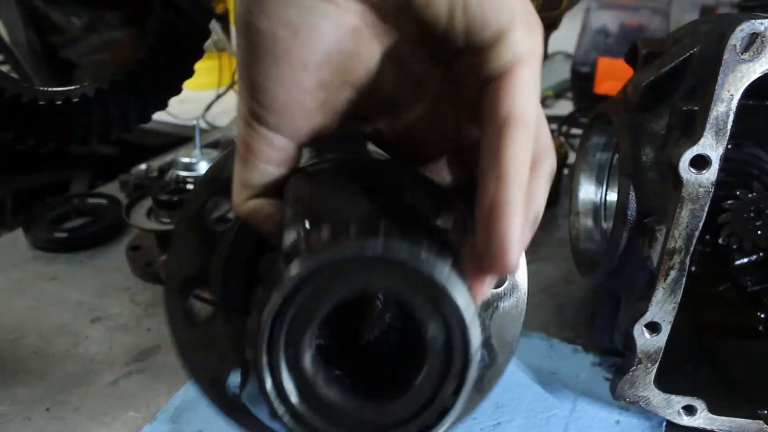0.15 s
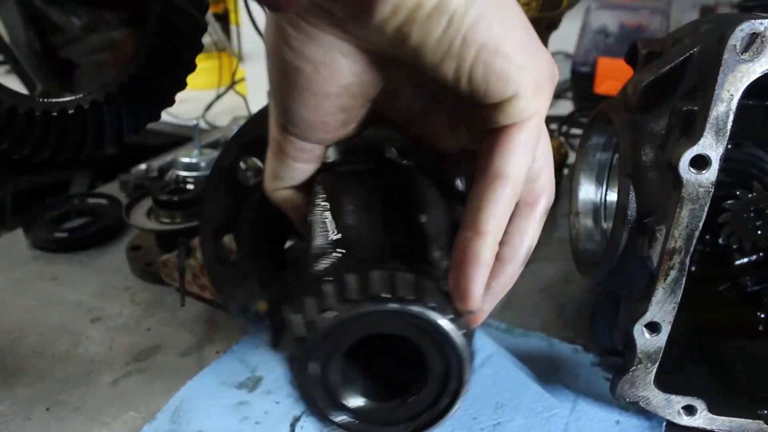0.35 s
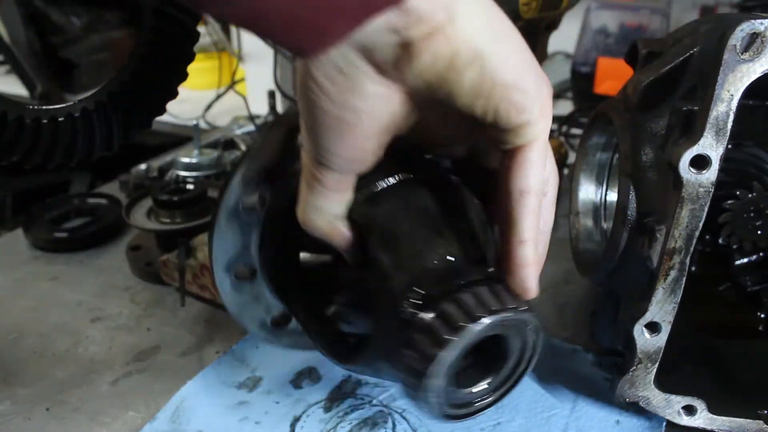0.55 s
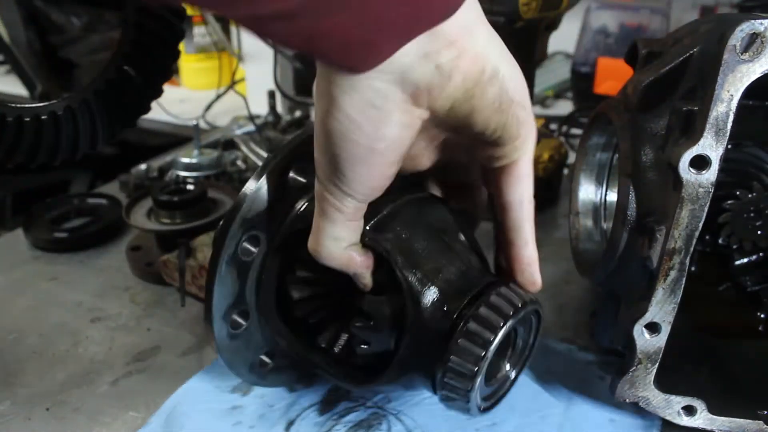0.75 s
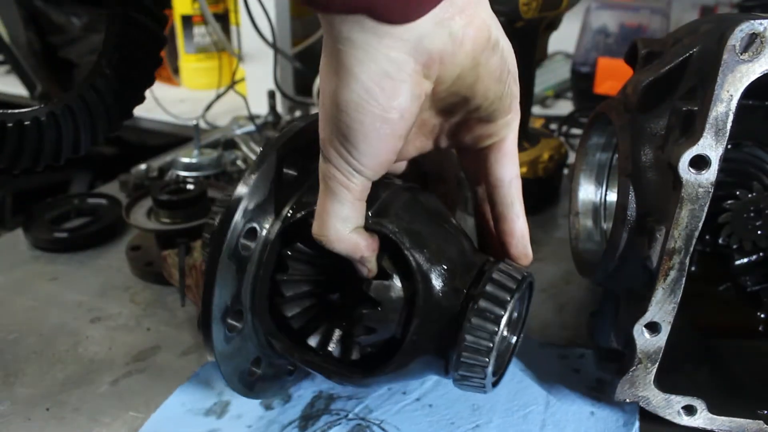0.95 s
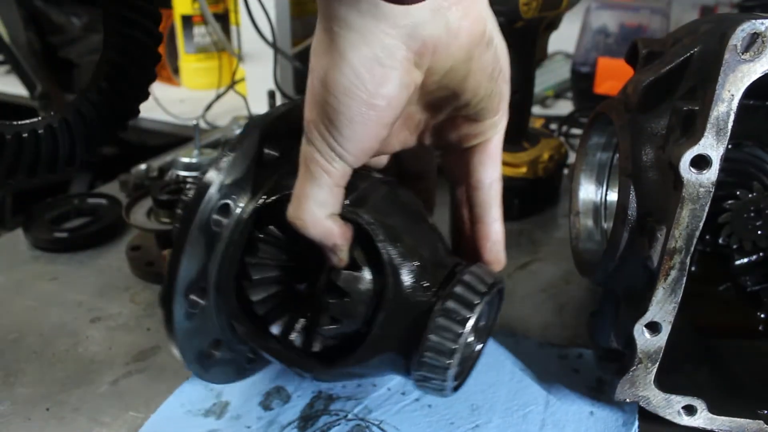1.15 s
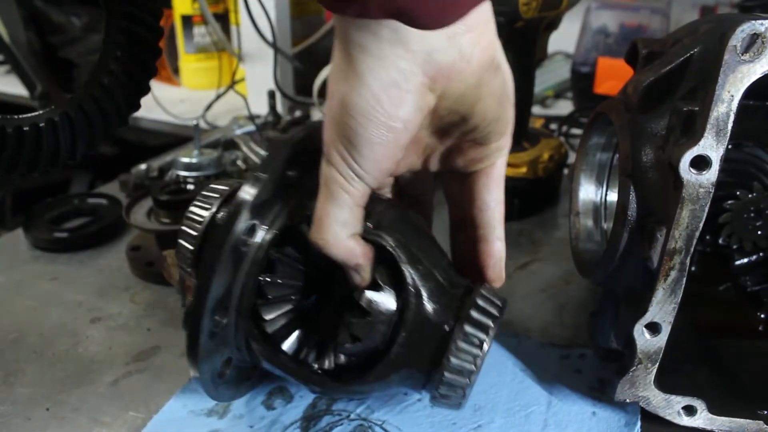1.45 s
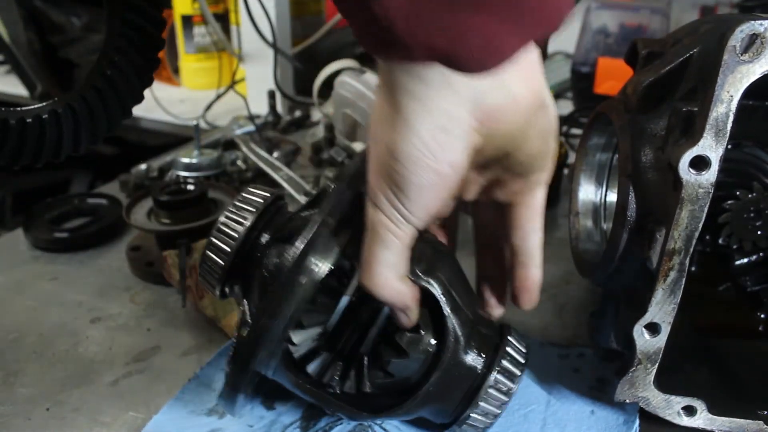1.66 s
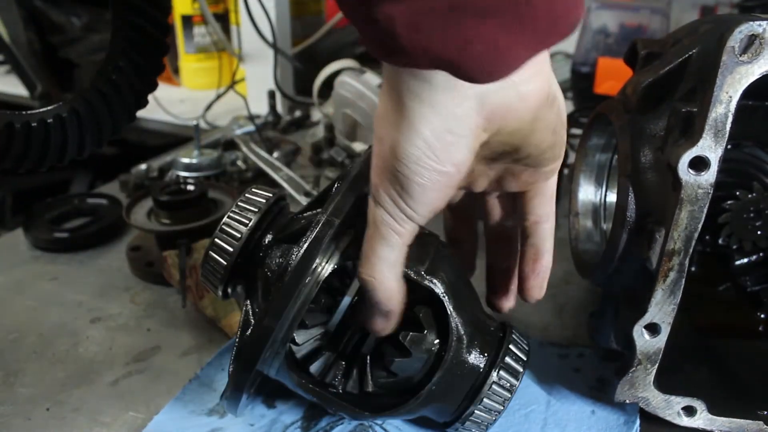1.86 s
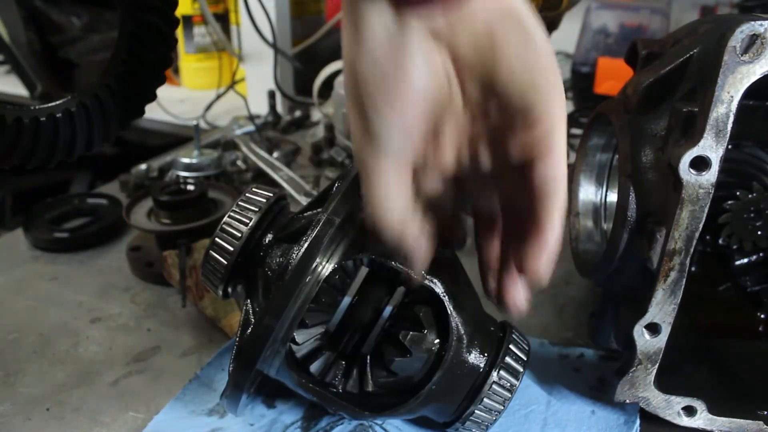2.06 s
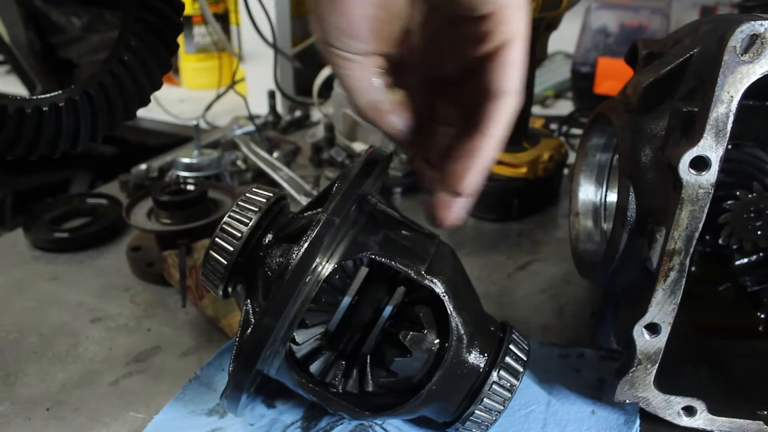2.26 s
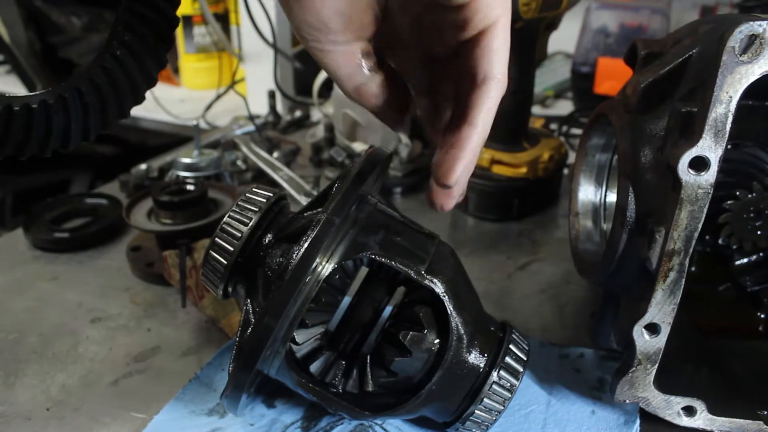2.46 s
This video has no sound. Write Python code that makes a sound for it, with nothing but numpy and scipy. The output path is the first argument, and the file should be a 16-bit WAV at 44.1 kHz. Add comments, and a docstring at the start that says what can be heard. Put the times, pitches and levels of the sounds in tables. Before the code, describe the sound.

Heavy metal differential set down with rattling knocks, tipped over, and dropped with a deep thud

```python
"""In workshop air, fingers shift on a heavy steel differential, which is set down on a towel-covered workbench.
It is tipped over and let drop on its flange. Each contact thuds the bench (decaying sines) and clunks the
gears (body modes and noise bursts); loose bearing rollers rattle and click (noise grains). After the drop steel
modes ring on faintly. As the hand lets go there is a rustle (shaped noise) and a short squeak (rough tone)."""
import sys
import numpy as np
from scipy import signal
from scipy.fft import rfft, irfft, next_fast_len
from scipy.io import wavfile
from scipy.ndimage import map_coordinates

SR = 44100
rng = np.random.default_rng(int(sys.argv[2]) if len(sys.argv) > 2 else 0)


def digitize_waveform(pressure):
    """Quantize a signal to 16-bit integers and store it at the path in sys.argv[1].

    Rows of a 2-D input are taken as channels; values are limited to [-1, 1].
    """
    field = np.atleast_2d(pressure).T
    bounded = np.clip(field, -1, 1)
    quanta = np.round(bounded * 32767).astype(np.int16)
    wavfile.write(sys.argv[1], SR, quanta)


N = 114660


def amp(db):
    """Decibels to gain."""
    return 10 ** (np.asarray(db) / 20)


def unit(x):
    """Scale to rms 1."""
    return x / np.sqrt(np.mean(x ** 2) + 1e-20)


def along(points, hz):
    """Interpolate (Hz, value) points on a log frequency axis."""
    f, v = np.transpose(points)
    return np.interp(np.log(hz + 1), np.log(f + 1), v)


def clock():
    """Seconds at each sample."""
    return np.arange(N) / SR


def fade(t60_s, t):
    """Exponential decay, 60 dB in t60_s."""
    return np.exp(-np.log(1000) * t / t60_s)


def wobble(knots_per_s):
    """Smooth random curve through normal random knots."""
    return map_coordinates(rng.standard_normal(N // 20), [clock() * knots_per_s], mode="wrap")


def noise(colour_db):
    """Noise of rms 1 with a spectrum given as a function of Hz."""
    m = next_fast_len(N)
    spectrum = rfft(rng.standard_normal(m)) * amp(colour_db(np.fft.rfftfreq(m, 1 / SR)))
    return unit(irfft(spectrum, m)[:N])


def add(track, start_s, sound):
    """Mix a sound in at a time."""
    i = round(start_s * SR)
    track[i:i + len(sound)] += sound[:N - i]


def rub(levels, colour, flutter_db):
    """Friction noise of a given colour along a fluttering level curve."""
    level_db = np.interp(clock(), *np.transpose(levels), left=-120)
    level_db = level_db + flutter_db * wobble(39.9)
    return amp(level_db) * noise(lambda f: along(colour, f))


def workshop():
    """Steady air noise, a faint wavering hum and a thin whine of narrow noise bands."""
    # air and hiss spectrum: (frequency [Hz], density [dB per Hz, relative])
    air_colour = [(12, -6), (20, -7), (65, -2), (85, -6.5), (119, -0.5), (176, -13), (221, -9), (365, -13),
                  (431, -11.5), (469, -18.5), (510, -12.5), (1110, -16.5), (2720, -19.5), (6290, -24.5),
                  (7030, -26.5), (11000, -30), (15800, -54)]
    # narrow bands in the hiss: (centre [Hz], level [dB])
    whine_bands = [(7000, -73), (9750, -74.5), (10850, -76.5), (13050, -79.5), (13900, -84)]
    air_db, hum_hz, hum_db, whine_width_hz = -53.5, 118.6, -67, 160

    air = amp(air_db) * noise(lambda f: along(air_colour, f))
    hum = amp(hum_db) * np.sin(2 * np.pi * hum_hz * clock() + .5 * wobble(7.3))
    whine = sum(amp(db) * noise(lambda f: -20 * np.log10(1 + ((f - hz) / whine_width_hz) ** 2))
                for hz, db in whine_bands)
    return air + hum + whine


def grip():
    """Fingers shift on the steel: friction noise with a fluttering level."""
    # finger friction: (time [s], level [dB])
    grip_levels = [(0, -69), (.09, -57), (.2, -64.5), (.35, -71), (1.96, -86), (2.02, -64), (2.12, -60.5),
                   (2.22, -68), (2.35, -68), (2.6, -71)]
    # its spectrum: (frequency [Hz], density [dB per Hz, relative])
    grip_colour = [(500, 10.5), (1500, -5), (2800, 9.5), (5000, 6.5), (10000, -2.5), (15000, -18)]
    return rub(grip_levels, grip_colour, flutter_db=3.5)


def thuds():
    """The bench top gives under the weight and swings for a few cycles: decaying sines."""
    # weight landing through the towel: (time [s], level [dB], pitch [Hz], t60 [s])
    landings = [(0.798, -31, 66, 0.15), (.876, -34, 69.6, 0.11), (.94, -39, 90, 0.24),
                (1.155, -43.5, 262, 0.086), (1.182, -47, 81, .13), (1.379, -28, 64, 0.18),
                (1.381, -27, 240, 0.036), (1.452, -36, 77, 0.22), (1.714, -20, 230, 0.048),
                (1.721, -24.5, 74, 0.2), (1.7237, -0.5, 205, 0.033), (1.795, -37, 92, 0.19),
                (1.924, -43, 166, .25), (.877, -23, 396, 0.046), (0.934, -17, 335, 0.065),
                (1.458, -14.5, 315, 0.025)]
    attack_s = 0.0029

    out, t = np.zeros(N), clock()[:SR]
    for start_s, db, hz, t60_s in landings:
        swing = np.sin(2 * np.pi * hz * t) * fade(t60_s, t)
        add(out, start_s, amp(db) * swing * (1 - np.exp(-t / attack_s)))
    return out


def roll():
    """The housing rolls on the towel: friction noise with a fluttering level."""
    # rolling: (time [s], level [dB])
    roll_levels = [(.8, -41.5), (.95, -45), (1.1, -49.5), (1.2, -52.5), (1.33, -56.5), (1.45, -38),
                   (1.6, -48), (1.71, -49.5), (1.9, -48.5), (2.1, -61)]
    # its spectrum: (frequency [Hz], density [dB per Hz, relative])
    roll_colour = [(30, -7.5), (100, -8), (160, -15.5), (235, 1.5), (400, -23), (900, -17.5), (2000, -31.5),
                   (8000, -53)]
    return rub(roll_levels, roll_colour, flutter_db=3.5)


def burst(colour, t60s):
    """Dense modes and room echo: a crack, then noise dying band by band."""
    contact_rise_s = 0.00018
    direct_db, direct_t60_s = 3, 0.077  # first crack over the room's answer

    hz, t, bands = signal.stft(noise(lambda f: along(colour, f))[:SR], SR, nperseg=256)
    band_fades = fade(along(t60s, hz)[:, None], t)
    tail = signal.istft(bands * band_fades, SR, nperseg=256)[1][:SR]
    age = clock()[:SR]
    crack = 1 + amp(direct_db) * fade(direct_t60_s, age)
    return tail * (1 - np.exp(-age / contact_rise_s)) * crack / 2


def blows():
    """Every contact rings modes of bench and housing and rattles the gears in noise bursts."""
    # housing contacts: (time [s], body modes [dB], clunk [dB], steel clatter [dB])
    contacts = [(.802, -42.5, -34, -38), (0.824, -48, -30.5, -50.5), (0.877, -34.5, -24, -40),
                (.886, -37, -29.5, -48), (0.935, -40, -30.5, -45), (1.009, -41.5, -48, -61),
                (1.154, -46.5, -59, -71), (1.397, -31, -26, -39.5), (1.440, -30, -42.5, -65),
                (1.458, -40, -34, -70), (1.654, -57.5, -53, -63), (1.7235, -13.5, -31, -71),
                (1.728, -20.5, -20.5, -26), (1.738, -29, -18.5, -31), (1.786, -29, -25.5, -35),
                (1.920, -37.5, -59, -69), (1.948, -49, -41, -65)]
    # bench and housing modes: (frequency [Hz], relative level [dB], t60 [s])
    body_modes = [(170, -12.5, 0.36), (209.2, -1, 0.22), (249, -16, 0.99), (336.5, 5.5, 0.17),
                  (384.3, -7, 0.54), (465.4, 2.5, 0.15), (501, -1, 0.11), (551, -4, 0.17), (580, -9, 0.45),
                  (723, -5.5, 0.27), (760, -39, 0.37), (989, -10, 0.18), (1110, -15, 0.26),
                  (1397, -20, 0.49), (2000, -37, 0.37), (2440, -19.5, .28)]
    # dense short modes of the parts: (frequency [Hz], density [dB per Hz, relative])
    clunk_colour = [(40, -22), (120, -14), (200, -1.5), (480, -6), (700, -10.5), (1100, -15), (1700, -18.5),
                    (3000, -24.5), (6000, -39), (15000, -68)]
    # their decay: (frequency [Hz], t60 [s])
    clunk_t60s = [(100, 0.67), (400, 0.48), (1500, 0.53), (4000, 0.4), (10000, 0.66)]
    # steel clatter: (frequency [Hz], density [dB per Hz, relative])
    clatter_colour = [(200, -20), (1000, 14), (2500, -3), (5000, 3), (8500, -1), (10800, -5), (12500, -17),
                      (15500, -29)]
    # its decay: (frequency [Hz], t60 [s])
    clatter_t60s = [(1000, 0.46), (5000, .28), (12000, 0.23)]
    attack_s, mode_scatter_db = 0.00075, 2.5

    out, t = np.zeros(N), clock()[:SR]
    for start_s, body_db, clunk_db, clatter_db in contacts:
        body = np.zeros(SR)
        for k, (hz, db, t60_s) in enumerate(body_modes):
            gain = (-1) ** k * amp(db + mode_scatter_db * rng.normal())  # alternating polarity
            body += gain * fade(t60_s, t) * np.sin(2 * np.pi * hz * t)
        add(out, start_s, amp(body_db) * body * (1 - np.exp(-t / attack_s)) / 2)
        clunk = amp(clunk_db) * burst(clunk_colour, clunk_t60s)
        clatter = amp(clatter_db) * burst(clatter_colour, clatter_t60s)
        add(out, start_s, clunk + clatter)
    return out


def rattle():
    """Bearing rollers tumble in their cage as the part first settles: random decaying noise grains."""
    # rollers turning: (time [s], level [dB])
    rattle_levels = [(.81, -49.5), (.825, -38), (.85, -48), (.88, -50), (.92, -47.5), (0.979, -52.5),
                     (1.05, -51), (1.09, -55), (1.16, -80)]
    # their spectrum: (frequency [Hz], density [dB per Hz, relative])
    rattle_colour = [(800, 1), (2500, 5), (4300, -5), (5600, 4), (7000, -1), (9500, 1), (11000, -2),
                     (12200, -13), (15500, -28)]
    start_s, ticks_per_s, spread_db, grain_t60_s = .803, 610, 3.5, 0.032

    hits = rng.random(N) < ticks_per_s / SR
    tick_power = hits * amp(spread_db * rng.standard_normal(N)) ** 2
    # grains overlap in power
    power = signal.fftconvolve(tick_power, fade(grain_t60_s, clock()) ** 2)[:N]
    grains = np.sqrt(np.abs(power))
    level_db = np.interp(clock(), *np.transpose(rattle_levels), right=-120)
    rollers = unit(grains * noise(lambda f: along(rattle_colour, f)))
    return (clock() > start_s) * amp(level_db) * rollers


def clicks():
    """Rollers and gear teeth tick: noise humps, each around its own pitch, with a short room tail."""
    # small clicks: (time [s], level [dB], centre [Hz], width [octaves])
    ticks = [(0.8046, -39, 10400, 0.4), (0.8589, -32, 9450, 0.3), (0.9739, -39.5, 6940, 1),
             (0.99, -51.5, 6000, 0.49), (1.034, -51.5, 5440, .4), (1.0512, -43.5, 10900, 0.24),
             (1.1684, -57, 7900, 0.43), (1.2236, -51, 4860, 0.27), (1.282, -43.5, 980, 0.22),
             (1.4817, -50, 9750, 0.4), (1.546, -56, 9900, .3), (1.721, -48, 8140, 0.37),
             (1.809, -57, 10400, .3), (1.982, -56.5, 10100, .4), (2.123, -52, 3960, 1)]
    t60_s, tail_db, tail_t60_s = 0.027, -8.5, 0.2
    skirt_db, top_hz = -3.5, 14000

    out, t = np.zeros(N), clock()
    shape = fade(t60_s, t) + amp(tail_db) * fade(tail_t60_s, t)
    for start_s, db, centre_hz, octaves in ticks:
        def colour_db(f):
            """Hump on a low-pass skirt, rolled off at the top."""
            hump = np.exp(-(np.log2((f + 1) / centre_hz) / octaves) ** 2)
            skirt = amp(skirt_db) / (1 + (f / centre_hz) ** 4)
            return 20 * np.log10((hump + skirt) / (1 + (f / top_hz) ** 8))
        add(out, start_s, amp(db) * shape * noise(colour_db))
    return out


def ring():
    """Lightly damped steel modes outlast the last drop, their phases wandering."""
    # steel modes: (frequency [Hz], level [dB], t60 [s])
    steel_modes = [(472, -60, 2.5), (682, -48.5, 3.6), (695, -48.5, 3.4), (893, -50.5, 2.4),
                   (930, -42, 1.05), (1203, -53, 1.4), (1700, -52, 2.3), (1900, -64, 2), (1960, -59, 2.4),
                   (2870, -61.5, 2.7)]
    start_s, wander_rad = 1.728, 0.7

    out, t = np.zeros(N), clock()
    for hz, db, t60_s in steel_modes:
        phase = 2 * np.pi * hz * t + wander_rad * wobble(25.1)
        add(out, start_s, amp(db) * fade(t60_s, t) * np.sin(phase))
    return out


def rustle():
    """The hand slides off and the sleeve draws back: friction noise with a fluttering level."""
    # hand and sleeve: (time [s], level [dB])
    rustle_levels = [(1.92, -62), (1.96, -51), (2.0, -46.5), (2.07, -53), (2.14, -46), (2.25, -52),
                     (2.4, -55.5), (2.6, -65)]
    # their spectrum: (frequency [Hz], density [dB per Hz, relative])
    rustle_colour = [(100, -6.5), (250, -8.5), (750, -2.5), (1200, -16), (1900, -10.5), (2500, -19.5),
                     (5000, -24.5), (10000, -28.5), (15000, -52.5)]
    return rub(rustle_levels, rustle_colour, flutter_db=2.7)


def squeak():
    """A brief stick-slip squeak on the oily steel: a phase-roughened tone and its echo."""
    peak_s, rise_s, fall_s = 1.967, .012, .009
    tone_hz, tone_db, rough_rad = 1529, -31.5, 0.57
    echo_db, echo_t60_s = -12.5, 0.3

    t = clock()
    swell = np.exp(-((t - peak_s) / np.where(t < peak_s, rise_s, fall_s)) ** 2)
    tone = amp(tone_db) * swell * np.sin(2 * np.pi * tone_hz * t + rough_rad * wobble(350))
    room = rng.standard_normal(N) * fade(echo_t60_s, t)
    echo = signal.fftconvolve(tone, room / np.linalg.norm(room))[:N]
    return tone + amp(echo_db) * echo


def scene():
    """Sum of all sources, one channel."""
    handling = grip() + roll() + rustle()
    impacts = thuds() + blows() + rattle() + clicks()
    return (workshop() + handling + impacts + ring() + squeak())[None]


def record(dry):
    """Remove everything above the band limit."""
    top_hz = 15500
    m = next_fast_len(N + SR // 2)
    return irfft(rfft(dry, m) * (np.fft.rfftfreq(m, 1 / SR) < top_hz), m)[..., :N]


dry = scene()
out = record(dry)
digitize_waveform(out)
```